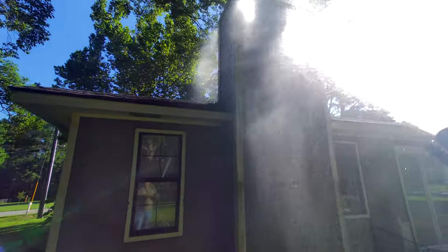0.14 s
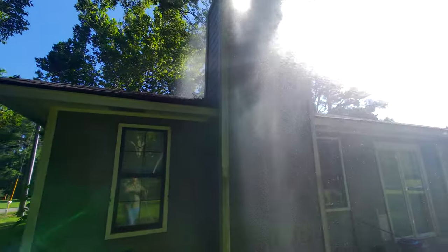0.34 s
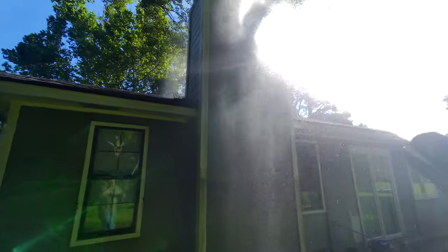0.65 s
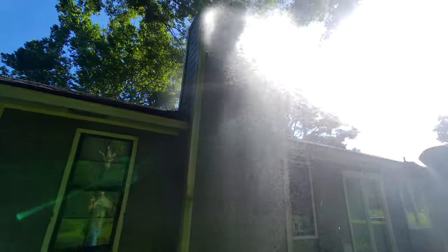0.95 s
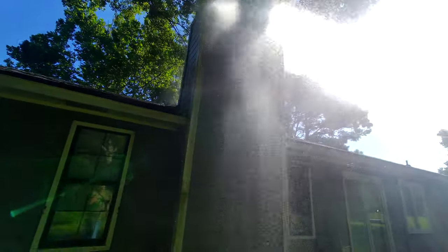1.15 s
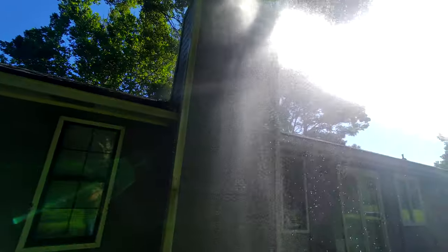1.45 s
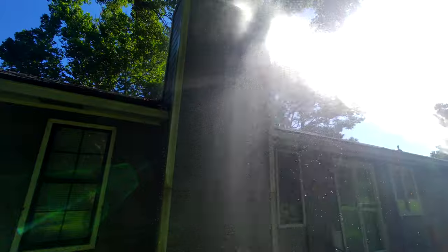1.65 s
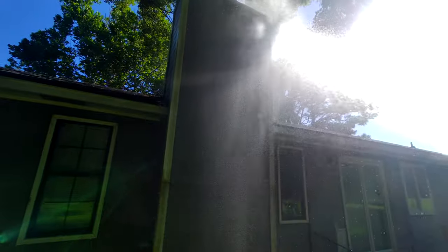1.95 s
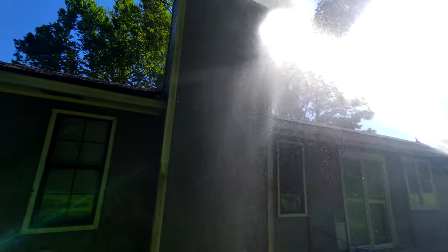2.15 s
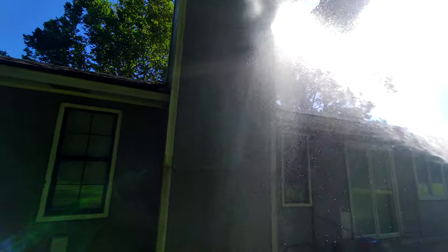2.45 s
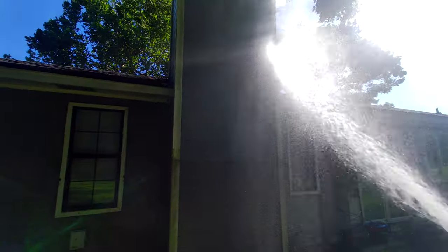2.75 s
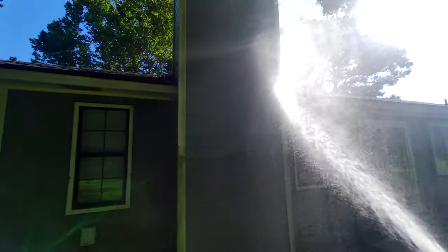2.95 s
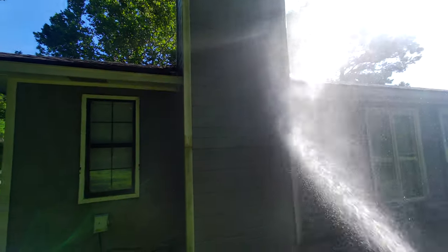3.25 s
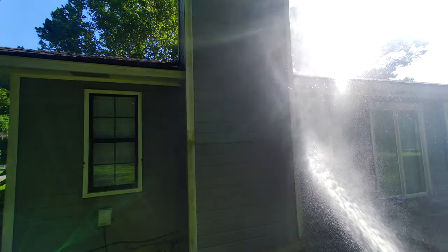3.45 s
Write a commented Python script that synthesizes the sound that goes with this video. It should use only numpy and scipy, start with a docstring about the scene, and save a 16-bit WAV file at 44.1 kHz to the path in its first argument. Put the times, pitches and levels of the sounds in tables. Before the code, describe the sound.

A pressure washer jet roars on a chimney outdoors, heard close from the lance in stereo; after two seconds it slides to the corner and thins, then drops down the edge, with a small engine humming farther off.

```python
"""The jet of a pressure washer plays on the chimney of a house, heard from the hand that holds the lance.
It roars in two moving resonances of noise and throws off hissing spray, shaped noise with single drops.
After two seconds it slides onto the corner, then down the edge; the siding drums and the trim is slapped.
Below lie a low rush of noise and, some way off, a small petrol engine built from steady partials."""
import sys
import numpy as np
from scipy import signal
from scipy.fft import rfft, irfft
from scipy.io import wavfile

SR = 44100
rng = np.random.default_rng(int(sys.argv[2]) if len(sys.argv) > 2 else 0)


def master(y):
    """Save y as 16-bit WAV."""
    cut = np.clip(np.atleast_2d(y).T, -1, 1)
    pcm = np.round(cut * 32767)  # scale
    wavfile.write(sys.argv[1], SR, pcm.astype(np.int16))


N = 158760
TIME = np.arange(N) / SR
HZ = np.maximum(np.arange(N // 2 + 1) * SR / N, 1)
CUTOFF_HZ = 15450


def from_db(db):
    """Decibels to gain."""
    return 10 ** (np.asarray(db) / 20)


def rms_one(x):
    """Scale to rms 1, both sides together."""
    return x / np.sqrt(np.mean(x ** 2) + 1e-20)


def in_time(rows):
    """Each column of a time course, at every sample."""
    s, *columns = np.transpose(rows)
    return np.array([np.interp(TIME, s, column) for column in columns])


def in_pitch(rows):
    """Each column of a spectrum at every frequency, joined along log frequency."""
    hz, *columns = np.transpose(rows)
    return np.array([np.interp(np.log(HZ), np.log(hz), column) for column in columns])


def drift(rate_hz):
    """Random wander of rms 1 whose movement falls off above the given rate."""
    spectrum = rfft(rng.standard_normal(N))
    return rms_one(irfft(spectrum / (1 + (HZ / rate_hz) ** 2), N))


def low_pass(x, hz, order):
    """Butterworth low-pass."""
    return signal.sosfilt(signal.butter(order, hz, fs=SR, output="sos"), x)


def at_ports(pair, likeness, phase):
    """Left and right spectra from two unrelated sounds, partly alike, the left turned ahead in phase."""
    a, b = rfft(pair)
    alike = np.clip(likeness, 0, .999)
    left = a * np.exp(1j * phase)
    right = alike * a + np.sqrt(1 - alike ** 2) * b
    return np.array([left, right])


def resonance(spectra, centre_hz, width_hz):
    """Noise in a resonance whose centre moves: filtered at the mean centre, then shifted; rms 1."""
    rest = centre_hz.mean()
    band = np.fft.ifft(spectra / (1 + (2 * (HZ - rest) / width_hz) ** 2), N)
    shift = np.exp(2j * np.pi * np.cumsum(centre_hz - rest) / SR)
    return rms_one(np.real(band * shift))


# two resonances that roar at the point of impact: [t/s, left level/dB, right level/dB, centre f/Hz]
LOW_ROAR = [(0, -39, -39, 2160), (.5, -36, -37.5, 2208), (.75, -32.5, -37, 2275), (1.4, -38.5, -44, 2339),
            (1.72, -34.5, -34.5, 2269), (2.1, -37.5, -44, 2334), (2.35, -46, -50, 2155),
            (2.65, -41.5, -44, 2180), (3.0, -56, -55, 2069), (3.3, -47, -45, 2118), (3.6, -36, -43, 2109)]
HIGH_ROAR = [(0, -30, -35.5, 2664), (.45, -35.5, -39, 2641), (.7, -35, -37, 2571), (1.2, -30, -32, 2541),
             (1.7, -33, -35, 2544), (2.15, -30.5, -32.5, 2538), (2.35, -38.5, -61, 2644),
             (2.65, -41.5, -35.5, 2611), (3.0, -40, -51, 2654), (3.22, -40.5, -40, 2622),
             (3.29, -33, -28, 2577), (3.39, -32.5, -45, 2586), (3.6, -28.5, -47, 2594)]
# phase of the roar between left and right: [f/Hz, lead of the left/rad]
ROAR_LEAD = [(1950, 2.41), (2250, 2.62), (2600, 2.444), (2900, 5.85)]
LOW_ROAR_WIDTH_HZ, HIGH_ROAR_WIDTH_HZ, ROAR_TOP_HZ = 370, 270, 2895


def impact_roar(course, width_hz):
    """The jet tears on the wall: a broad resonance of noise that moves with the aim."""
    left_db, right_db, centre = in_time(course)
    lead = in_pitch(ROAR_LEAD)[0]
    ports = at_ports(rng.standard_normal((2, N)), 1, lead)
    roar = low_pass(resonance(ports, centre, width_hz), ROAR_TOP_HZ, order=10)
    return from_db([left_db, right_db]) * rms_one(roar)


# colour of the spray on the flat face, on the corner and down the edge:
# [f/Hz, left level/dB per Hz, right level/dB per Hz, left-right likeness 0-1, lead of the left/rad]
FACE_HISS = [(1050.0, -100.0, -100.0, 1, -0.5), (1410, -82, -78.5, 0.5, -2.4),
             (1830, -78.5, -70, 0.48, -3.5), (2170, -71.5, -68.5, 0.92, -3), (2630, -71.5, -72, 0.88, -4),
             (3060, -71.5, -71, 0, -1.5), (3490, -75.5, -71, 0.83, -0.5), (3780, -80, -80.5, 0.3, -0.0),
             (4220, -72.5, -71, 0.57, -0.3), (4720, -73.5, -77, 0.92, 0.1), (5540, -80.5, -75.5, 0.6, -1),
             (5600, -81.5, -79.5, 0.75, -0.1), (6080, -78.5, -76, 0.36, 1), (6380, -74, -69.5, 0.6, 0.7),
             (6500, -76, -69, 0.45, 0.0), (7200.0, -89, -66, 0.45, -2.3), (7580, -76.5, -64.5, 0.61, -2),
             (7850, -75, -74, 0.5, -3), (8400.0, -86, -79, 0.24, -0.5), (9000.0, -84.5, -78, 0.45, -5),
             (9650, -78.5, -73, 0.53, -5.5), (10380, -80.5, -79, 0.51, -7), (11450, -81, -82, 0.25, -9.6),
             (12500.0, -82.5, -81, 0.16, -6.7), (13500.0, -83, -82.5, 0.3, -6.1),
             (15000.0, -90, -91.5, 0.3, -8)]
CORNER_HISS = [(1050.0, -100.0, -100.0, 0.96, -0.5), (1450.0, -80, -88.5, 0.3, -0.3),
               (1810, -74, -73.0, 0.89, -3.5), (2200.0, -71.0, -72, 0.67, -3.5),
               (2630, -74.5, -71.5, 0.54, -2), (3070, -78.0, -69.5, 0.32, 0.5),
               (3600, -82, -68.5, 0.65, -2), (3880, -82.5, -78.5, 0.43, 2), (4200, -78.5, -74.0, 0.21, 0.1),
               (4730, -77.5, -78.0, 0.29, 3), (5130, -82.5, -84, 0.44, 2), (5500.0, -80, -81.5, 0.4, 0.8),
               (5850.0, -80.5, -74.5, 0.45, 3.5), (6350.0, -73.5, -69.5, 0.95, 0.9),
               (6750.0, -80, -68.5, 0.63, 0), (7240, -77, -67, 0.67, -1.2), (7550.0, -79.0, -67, 0.78, -2),
               (7800, -83, -72, 0.69, -3), (8330, -84, -79.5, 0.6, -3), (8900, -96, -91, 0.44, -2),
               (9650, -86.0, -83.5, 0.74, -7), (10460, -81.5, -81.0, 0.86, -6.5),
               (11300, -78, -79, 0.35, -5), (12500.0, -84.0, -78.0, 0.2, -3.4),
               (13500.0, -91, -82, 0.19, -4.5), (15000.0, -94, -84, 0.23, -7.3)]
EDGE_HISS = [(1050.0, -100.0, -100.0, 0.7, -1), (1440, -77, -78.5, 0.88, -1.9),
             (1860, -68.5, -68.5, 0.91, -3), (2220, -81, -76, 0.9, -4), (2630, -66, -71.0, 0.7, -2.5),
             (3050, -72, -71.5, 0.52, 0), (3510, -76.0, -65, 0.81, -0.8), (3840, -76.5, -75, 0.97, -1.5),
             (4250.0, -70, -75.5, 0.63, -0.8), (4700.0, -68.5, -79, 0.64, -1.5),
             (5200.0, -81.5, -80.5, 0.12, 1), (5540, -84, -86, 0.93, -2.5), (5830, -78.5, -69, 0.5, -2.5),
             (6350.0, -75, -69, 0.73, -3.5), (6750.0, -70, -68.5, 0.82, -6.5), (7140, -79.0, -68, 0.46, -8),
             (7550.0, -74, -64.5, 1, -6.8), (7870, -81, -77, 0.52, -7.0), (8400.0, -86.5, -75, 0.19, -9),
             (9000.0, -90.5, -85, 0.23, -8.9), (9700.0, -83, -78, 0.6, -5),
             (10400.0, -75, -78.5, 0.54, -5.5), (11500, -75, -78.5, 0.39, -4.5),
             (12500.0, -78, -77.0, 0.3, -2), (13500.0, -93.0, -79.5, 0.11, -1.0),
             (15000.0, -91.0, -85, 0.22, -0.8)]
# gain that rides on the whole spray: [t/s, left level/dB, right level/dB]
HISS_GAIN = [(0, -1.5, -1.5), (.45, 0, 1.5), (.7, -0.5, 0), (2.0, -0.5, 0), (2.35, -0.5, -0.5),
             (2.65, 0.5, 0.5), (2.9, 0, 0), (3.14, -1, 0.5), (3.3, -1.5, 0), (3.6, -1, 0)]
CORNER_AT_S, SLIDE_S = 2.23, 0.46   # middle and length of the slide onto the corner
EDGE_AT_S, DROP_DOWN_S = 3.26, 0.11   # middle and length of the quick drop down the edge
DROPS_PER_S, DROP_SPREAD_DB = 6000, 3   # on each side
DROP_SHARE = .3   # of the power; mist is the rest


def water(table):
    """Single drops of uneven size among smooth mist, coloured by the surface they strike."""
    size_db = DROP_SPREAD_DB * np.minimum(rng.exponential(1, (2, N)), 5)
    sizes = from_db(size_db) * rng.choice([-1, 1], (2, N))
    drops = rms_one(sizes * (rng.random((2, N)) < DROPS_PER_S / SR))
    mist = rng.standard_normal((2, N))
    sound = np.sqrt(DROP_SHARE) * drops + np.sqrt(1 - DROP_SHARE) * mist
    sound = sound * np.sqrt(SR / 2)   # unit power per Hz
    left_db, right_db, likeness, lead = in_pitch(table)
    return irfft(at_ports(sound, likeness, lead) * from_db([left_db, right_db]), N)


def spray():
    """Mist and drops, crossfaded at equal power from face to corner to edge."""
    slid = np.clip((TIME - CORNER_AT_S) / SLIDE_S + .5, 0, 1)
    down = np.clip((TIME - EDGE_AT_S) / DROP_DOWN_S + .5, 0, 1)
    hiss = np.sqrt(1 - slid) * water(FACE_HISS)
    hiss = hiss + np.sqrt(slid * (1 - down)) * water(CORNER_HISS)
    hiss = hiss + np.sqrt(down) * water(EDGE_HISS)
    return from_db(in_time(HISS_GAIN)) * hiss


WAVER_DB, WAVER_RATE_HZ, WAVER_BAND_HZ = 1.71, 2.4, 450


def wavering(x):
    """The colour wavers: overlapping bands swell and sink slowly, each on its own."""
    spectra = rfft(x)
    out = 0
    for hz in np.arange(0, CUTOFF_HZ + WAVER_BAND_HZ, WAVER_BAND_HZ):
        band = irfft(spectra * np.maximum(1 - abs(HZ - hz) / WAVER_BAND_HZ, 0), N)
        out = out + from_db(WAVER_DB * drift(WAVER_RATE_HZ)) * band
    return out


# swells of two narrow bands of hiss on the left: [t/s, level/dB]
SIZZLE_SWELL = [(0, -53), (2.1, -55), (2.3, -39), (2.7, -45), (2.82, -63), (3.12, -57), (3.24, -44),
                (3.6, -49)]
RASP_SWELL = [(0, -56), (.2, -57), (.45, -43), (.65, -44), (.9, -55), (3.6, -57)]
SIZZLE_HZ, SIZZLE_WIDTH_HZ = 7650, 1100
RASP_HZ, RASP_WIDTH_HZ = 4570, 540


def sizzle(level, hz, width_hz):
    """A narrow band of noise swells on the left as the aim changes."""
    band = resonance(rfft(rng.standard_normal(N)), np.full(N, hz), width_hz)
    return from_db(in_time(level)) * band * [[1], [0]]


# drumming of the siding, and a lower resonance of the wall under the jet: [t/s, level/dB, centre f/Hz]
SIDING_DRUM = [(0, -42.5, 811.7), (.45, -41, 850), (.8, -41.5, 952.9), (1.4, -42.5, 950.4),
               (2.1, -42.5, 946.8), (2.45, -46, 944.8), (2.85, -47, 922.4), (3.1, -52, 941.9),
               (3.33, -42.5, 940.5), (3.6, -43, 971.7)]
WALL_DRUM = [(0, -57, 340), (.5, -52.5, 349.8), (1.0, -49.5, 390.5), (1.5, -56, 419.3), (2.0, -55, 489),
             (2.6, -57, 480.3), (3.1, -55.5, 481.2), (3.35, -51.5, 500), (3.6, -53, 520.2)]
SIDING_WIDTH_HZ, WALL_WIDTH_HZ, DRUM_TOP_HZ = 510, 190, 1248


def drumming(course, width_hz):
    """Noise from the jet excites one moving resonance, almost alike on both sides."""
    db, centre = in_time(course)
    drum = resonance(at_ports(rng.standard_normal((2, N)), 1, 0), centre, width_hz)
    return from_db(db) * rms_one(low_pass(drum, DRUM_TOP_HZ, order=8))


def siding():
    """The boards drum under the jet in two resonances, less when it only grazes the corner."""
    return drumming(SIDING_DRUM, SIDING_WIDTH_HZ) + drumming(WALL_DRUM, WALL_WIDTH_HZ)


# three moving hollows in the shared sound, one course each: [t/s, centre f/Hz, depth 0-1]
HOLLOW_COURSES = [
    [(0, 1950, 1), (.45, 1880, 1), (.7, 1990, 0.72), (1.9, 1930, 0.58), (2.4, 1860, 0.8), (3.2, 1870, .9),
     (3.3, 2060, 1), (3.6, 2180, 0.85)],
    [(0, 2990, 0.4), (.4, 2990, 0.87), (.62, 3100, 1), (.85, 2820, 0.76), (1.7, 2800, 0.84),
     (2.1, 2930, 0.94), (2.3, 2960, 0.24), (3.6, 2960, 0.32)],
    [(0, 5090, 0.4), (2.1, 5130, .4), (2.38, 5400, 1), (2.52, 5060, .8), (2.75, 5020, 1), (3.25, 5050, 0.7),
     (3.37, 5430, .95), (3.6, 5450, 1)],
]
HOLLOW_HALF_WIDTH_HZ = 140


def hollowed(pair):
    """Three narrow moving bands are thinned out of the part common to left and right."""
    shared, out = signal.hilbert(pair.mean(axis=0)), pair
    narrow = 1 / (1 + (np.fft.fftfreq(N, 1 / SR) / HOLLOW_HALF_WIDTH_HZ) ** 4)
    for course in HOLLOW_COURSES:
        centre, depth = in_time(course)
        turn = np.exp(2j * np.pi * np.cumsum(centre) / SR)
        # bring the moving centre to 0 Hz, keep the narrow band, move it back
        band = np.fft.ifft(np.fft.fft(shared / turn) * narrow) * turn
        out = out - np.clip(depth, 0, 1) * np.real(band)
    return out


# hard slaps of water on the trim: [t/s, left starting level/dB, right starting level/dB, f/Hz, t60/s]
TRIM_SLAPS = [(2.904, -27.5, -30, 1020, .024), (2.907, -34, -40, 1570, 0.037),
              (3.381, -32, -16.5, 3560, 0.0085)]


def slaps():
    """A slug of water makes the trim ring briefly: a decaying sine."""
    out = np.zeros((2, N))
    for s, left_db, right_db, hz, t60 in TRIM_SLAPS:
        age = np.maximum(TIME - s, 0)
        decay = from_db(-60 * np.minimum(age / t60, 2))
        out += from_db([[left_db], [right_db]]) * decay * np.sin(2 * np.pi * hz * age)
    return out


# colour of the low rush of the wall and the machine: [f/Hz, level/dB per Hz]
RUSH_COLOUR = [(20, -90), (40, -85), (65, -79), (100, -75.5), (140, -70), (200, -73), (300, -78),
               (450, -80), (600, -77.5), (1100, -74.5), (1500, -90.5), (2500, -105)]
# gain of the rush above the bass; it thins as the jet only grazes the corner: [t/s, level/dB]
RUSH_GAIN = [(0, -1.5), (.6, 0.5), (2.1, .5), (2.5, 0), (2.9, -0.5), (3.08, -2), (3.33, 1), (3.6, 0.5)]
RUSH_LIKENESS, RUSH_BASS_TOP_HZ = 0.92, 260


def rush():
    """Low noise, steady and almost fully alike on both sides in the bass; the rest follows the aim."""
    likeness = np.interp(HZ, [250, 550], [1, RUSH_LIKENESS])
    noise = rng.standard_normal((2, N)) * np.sqrt(SR / 2)   # unit power per Hz
    spectra = at_ports(noise, likeness, 0) * from_db(in_pitch(RUSH_COLOUR))
    bass = 1 / (1 + (HZ / RUSH_BASS_TOP_HZ) ** 8)
    upper = irfft(spectra * (1 - bass), N)
    return irfft(spectra * bass, N) + from_db(in_time(RUSH_GAIN)) * upper


# gain that rides on the engine: [t/s, thud level/dB, exhaust note level/dB]
ENGINE_GAIN = [(0, -1, -5.5), (.6, 1.5, -1.5), (1.2, -2, -2), (1.45, 0, 1.5), (2.3, -1.5, -0.5),
               (3.6, 0.5, 1.5)]
# partials before that gain: [multiple of the firing rate, rms level/dB]
THUD_PARTIALS = [(1, -66), (2, -53), (3, -57.5), (4, -59)]
EXHAUST_PARTIALS = [(5, -49.5), (6, -52), (7, -69.5), (8, -55), (9, -58), (12, -63), (13, -83), (14, -64.5),
                    (15, -61), (18, -58.5)]
FIRINGS_PER_S = 27.47
MUFFLER_HZ, MUFFLER_WIDTH_HZ = 143.5, 18   # resonance that turns the phases of the partials
PULSE_SMEAR = 0.1187   # rad per squared multiple: higher partials arrive later
ENGINE_WAVER_DB, ENGINE_WAVER_RATE_HZ = .5, 2.8


def engine():
    """One cylinder at governed speed: firing partials lagged by the muffler; the exhaust note wavers."""
    thud_db, exhaust_db = in_time(ENGINE_GAIN)

    def partial(multiple, db):
        k = round(multiple)
        hz = k * FIRINGS_PER_S
        lag = np.arctan(2 * (hz - MUFFLER_HZ) / MUFFLER_WIDTH_HZ) + PULSE_SMEAR * k ** 2
        return np.sqrt(2) * from_db(db) * np.cos(2 * np.pi * hz * TIME - lag)

    thud = sum(partial(k, db + thud_db) for k, db in THUD_PARTIALS)
    exhaust = sum(partial(k, db + exhaust_db + ENGINE_WAVER_DB * drift(ENGINE_WAVER_RATE_HZ))
                  for k, db in EXHAUST_PARTIALS)
    return thud + exhaust


FLUTTER_DB, FLUTTER_RATE_HZ = 0.68, 52   # the jet breaks up unevenly
SURGE_DB, SURGE_RATE_HZ = .7, 26   # the roar comes in uneven surges


def scene():
    """The fluttering jet on the wall, over the slaps, the rush and the engine."""
    flutter = from_db(FLUTTER_DB * drift(FLUTTER_RATE_HZ))
    surges = from_db(SURGE_DB * drift(SURGE_RATE_HZ))
    roar = impact_roar(LOW_ROAR, LOW_ROAR_WIDTH_HZ) + impact_roar(HIGH_ROAR, HIGH_ROAR_WIDTH_HZ)
    bands = sizzle(SIZZLE_SWELL, SIZZLE_HZ, SIZZLE_WIDTH_HZ) + sizzle(RASP_SWELL, RASP_HZ, RASP_WIDTH_HZ)
    jet = surges * roar + wavering(spray()) + bands + siding()
    return flutter * hollowed(jet) + slaps() + rush() + engine()


# narrow fixed dips at whole kilohertz in the treble: [f/Hz, depth/dB]
TREBLE_DIPS = [(3000, 5), (4000, 9), (5000, 8), (6000, 7), (7000, 8), (8000, 5)]
DIP_WIDTH_HZ = 115


def record(dry):
    """Narrow fixed dips are cut into the treble; the top is cut off steeply."""
    dips_db = sum(depth * np.exp(-((HZ - hz) / DIP_WIDTH_HZ) ** 2) for hz, depth in TREBLE_DIPS)
    top = 1 / np.sqrt(1 + (HZ / CUTOFF_HZ) ** 400)
    return irfft(rfft(dry) * from_db(-dips_db) * top, N)


dry = scene()
out = record(dry)
master(out)
```